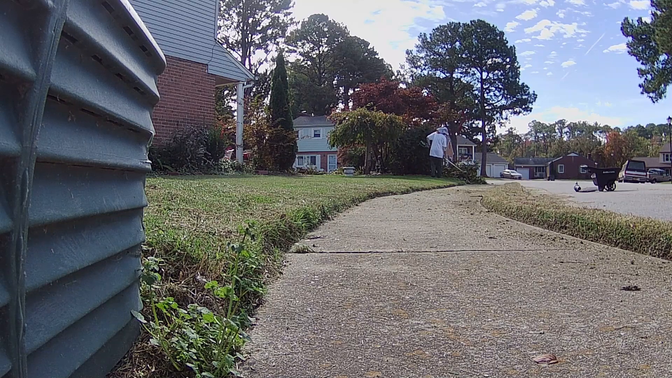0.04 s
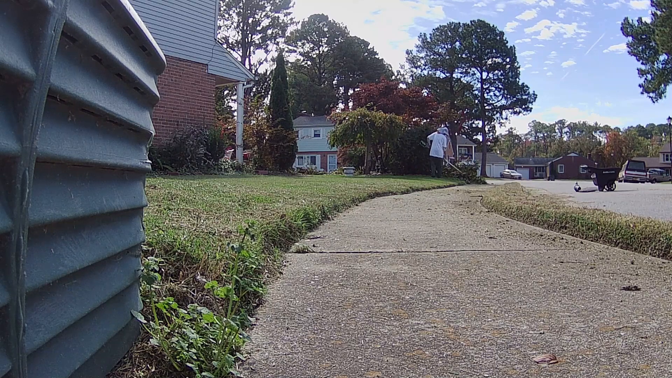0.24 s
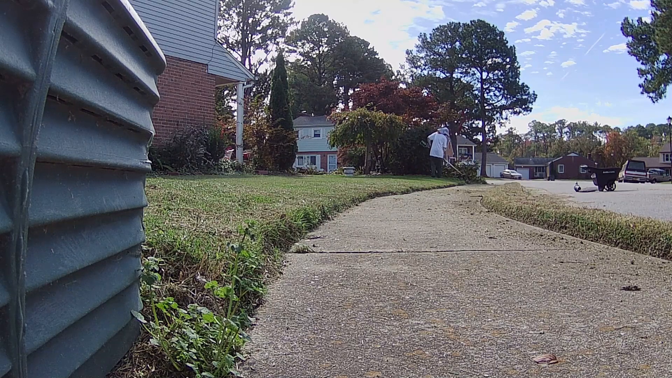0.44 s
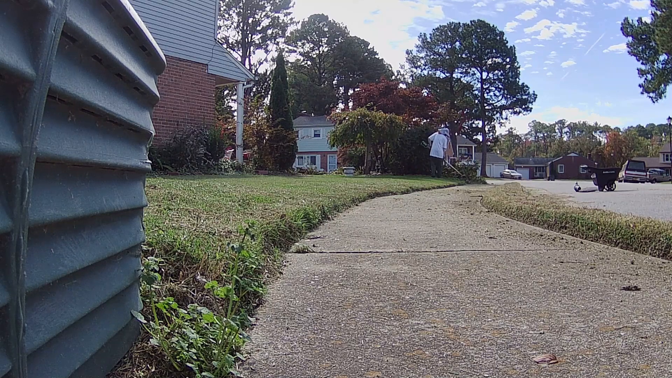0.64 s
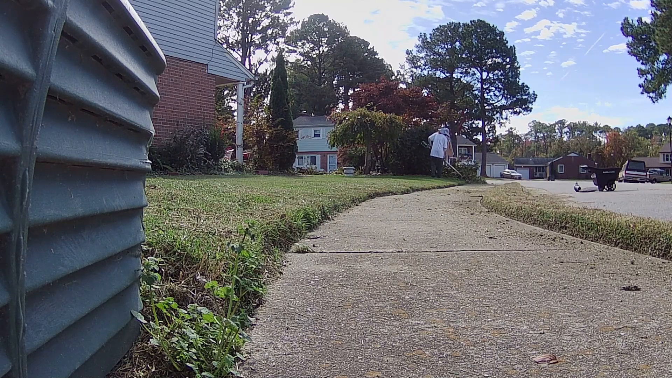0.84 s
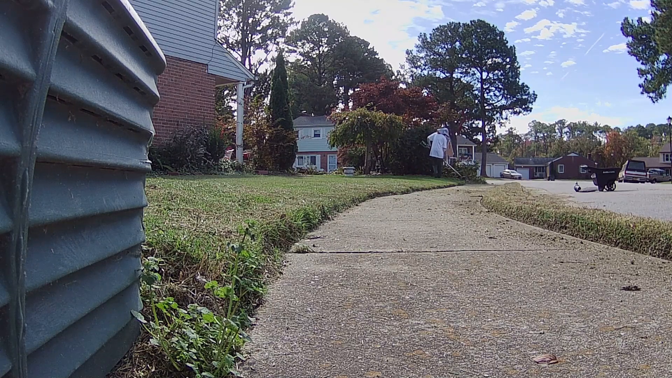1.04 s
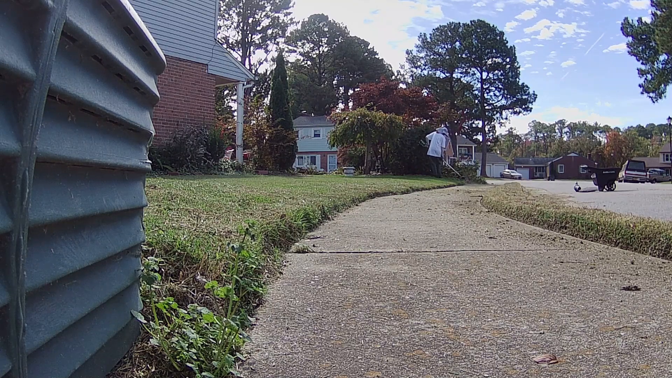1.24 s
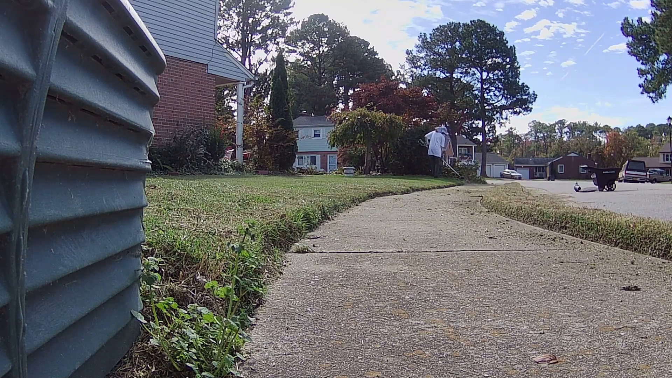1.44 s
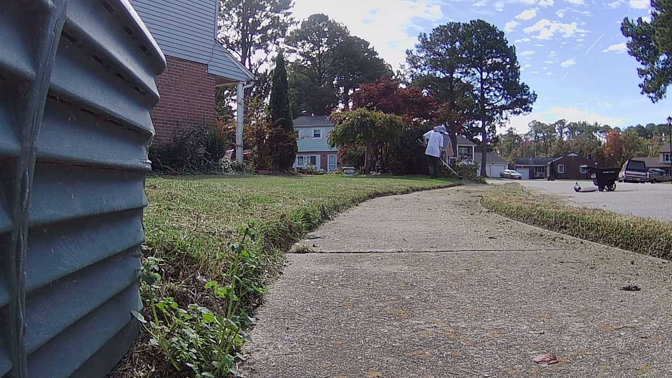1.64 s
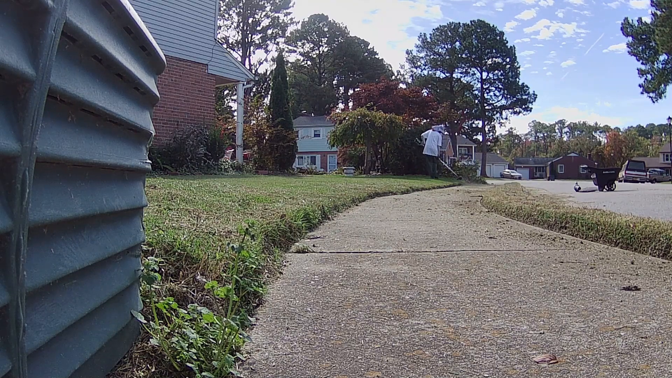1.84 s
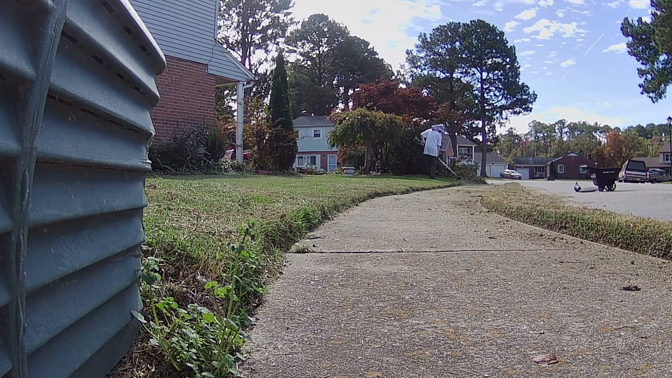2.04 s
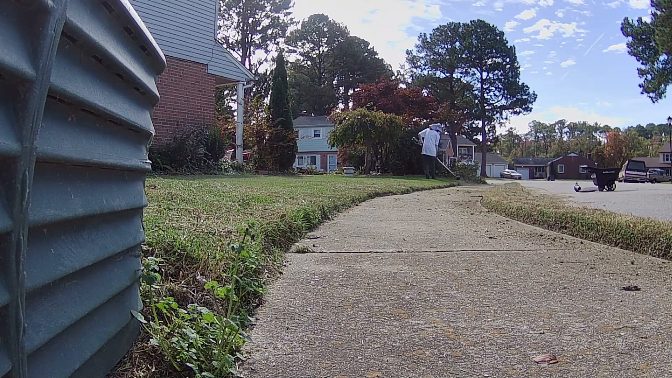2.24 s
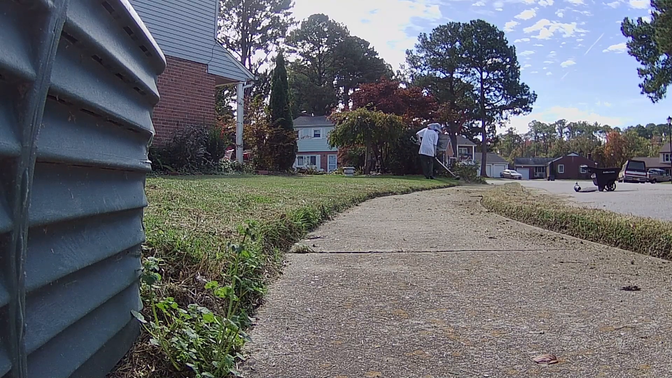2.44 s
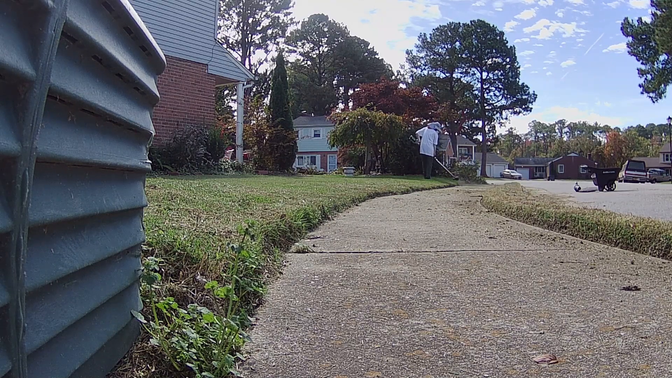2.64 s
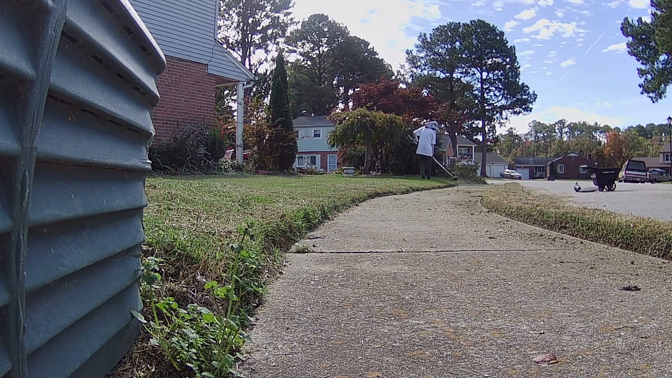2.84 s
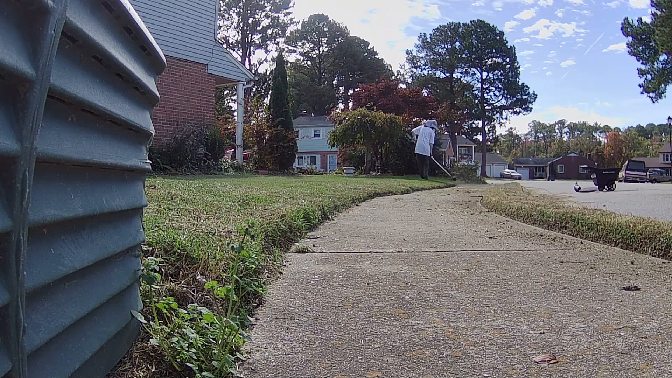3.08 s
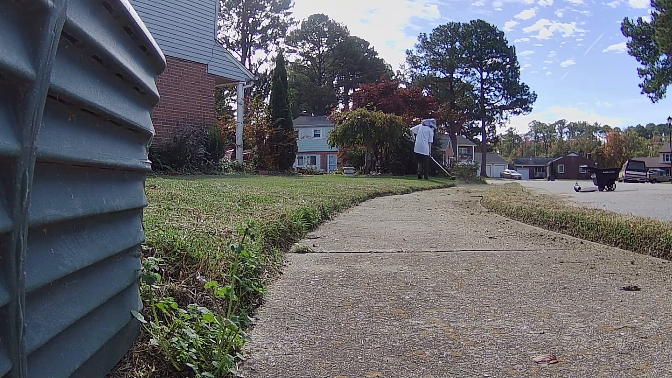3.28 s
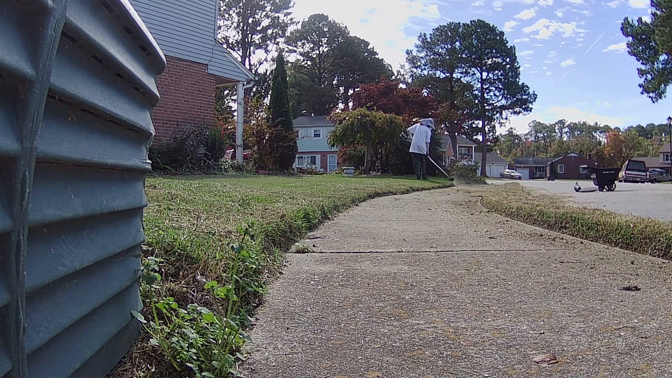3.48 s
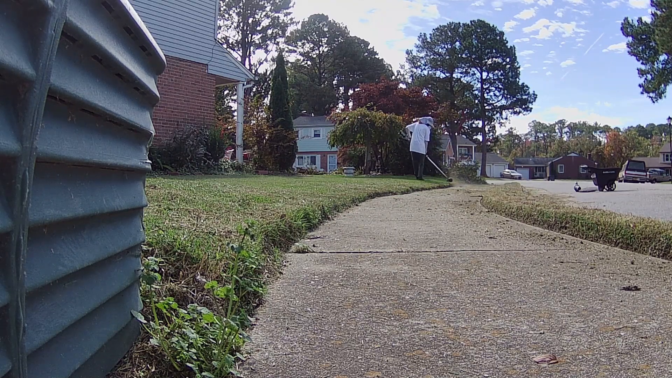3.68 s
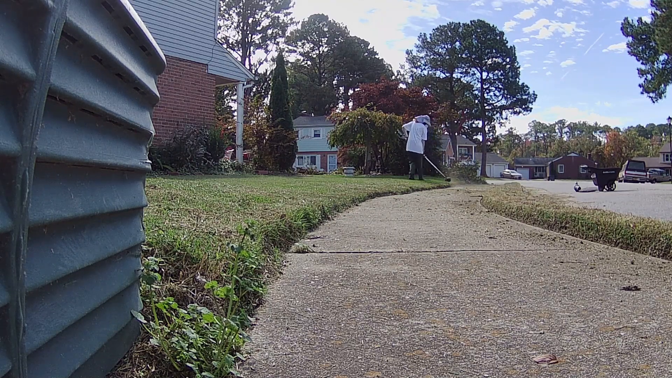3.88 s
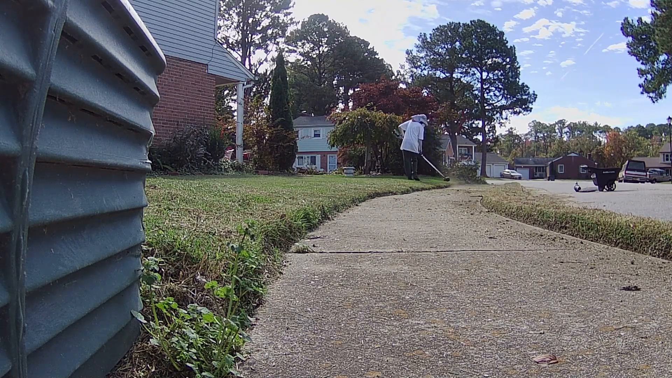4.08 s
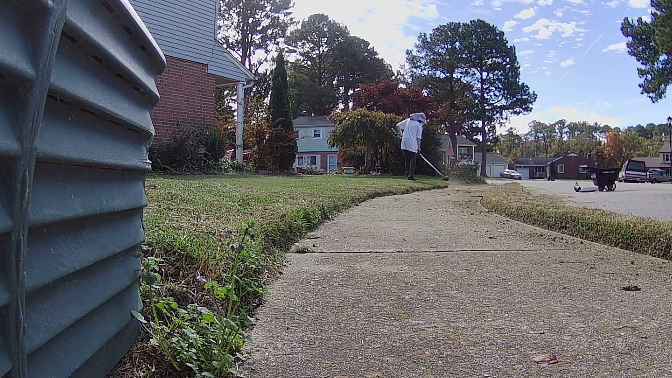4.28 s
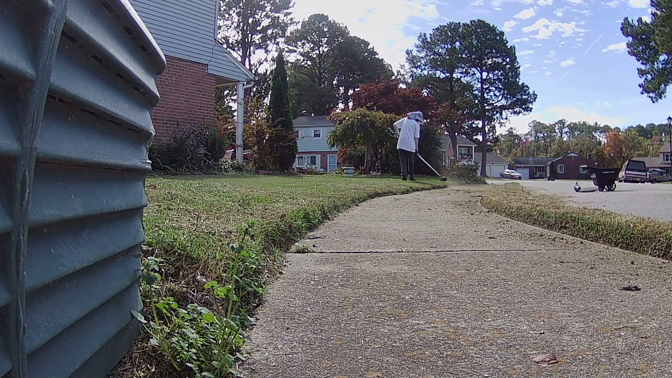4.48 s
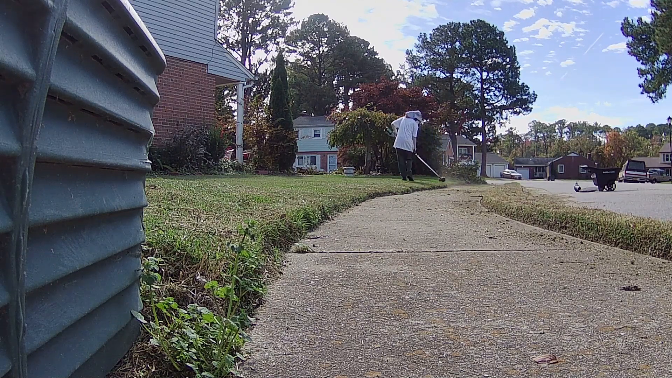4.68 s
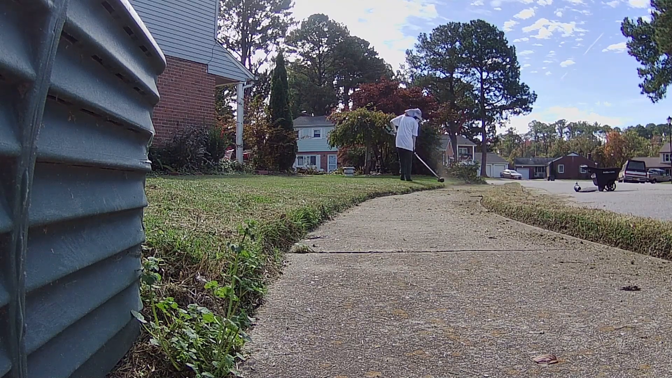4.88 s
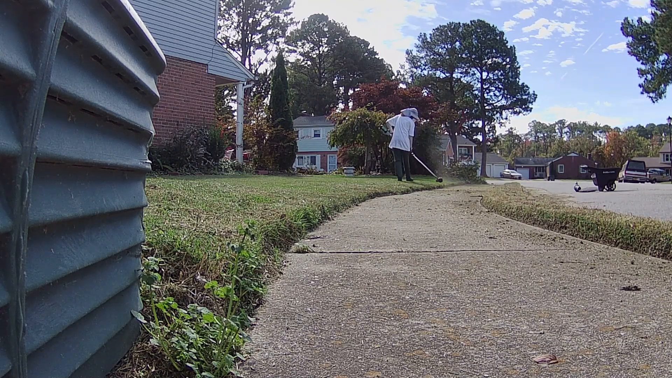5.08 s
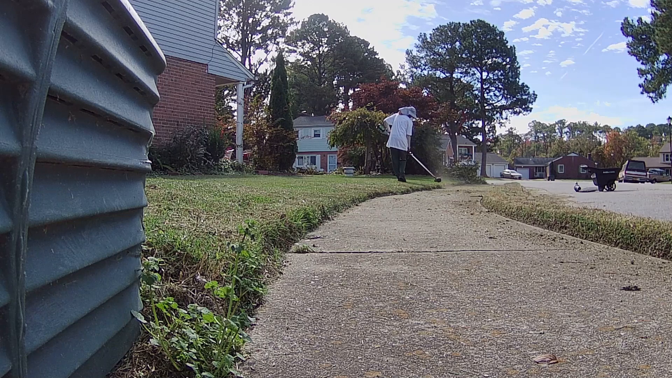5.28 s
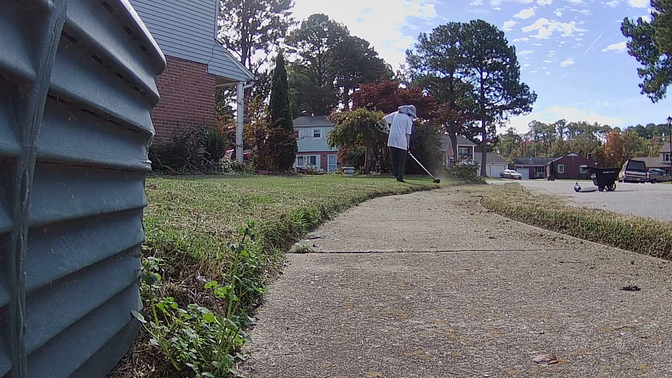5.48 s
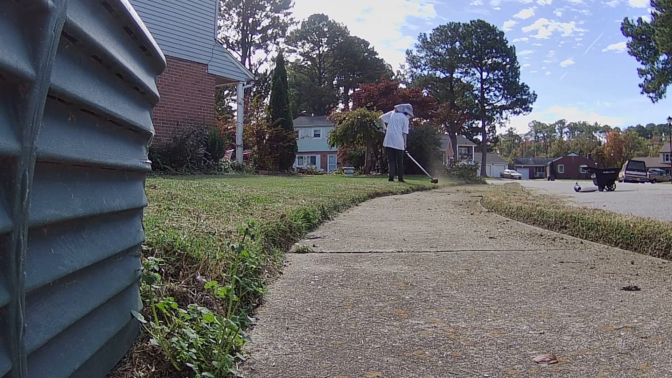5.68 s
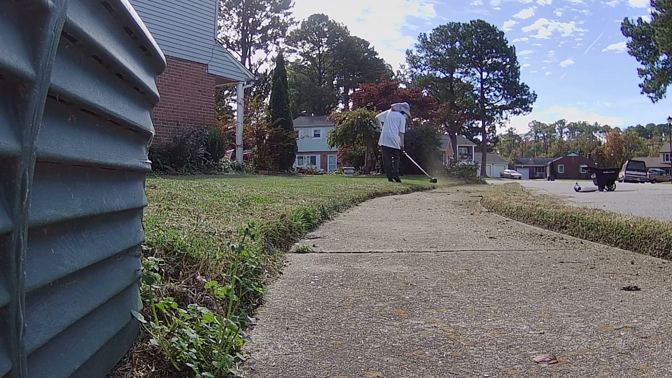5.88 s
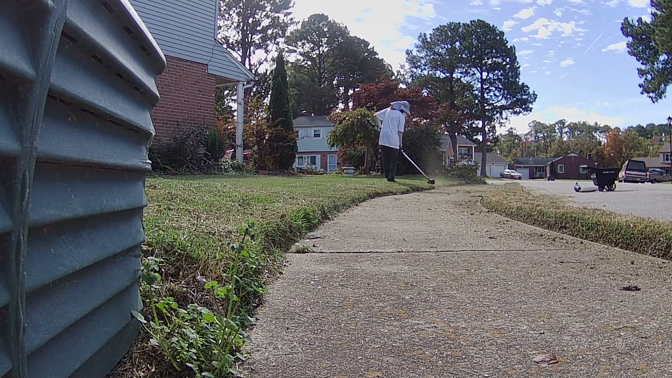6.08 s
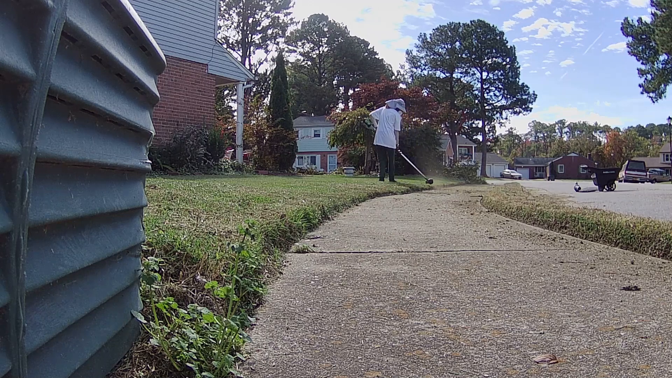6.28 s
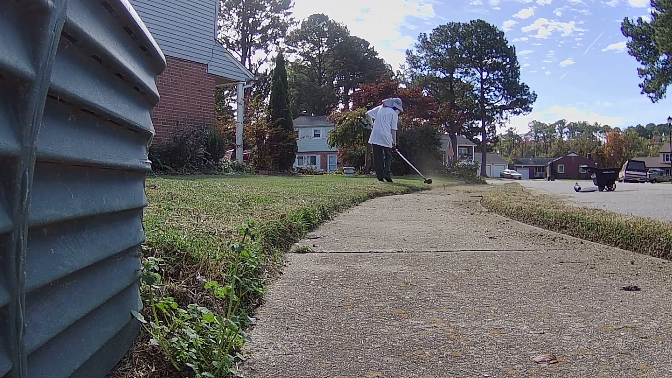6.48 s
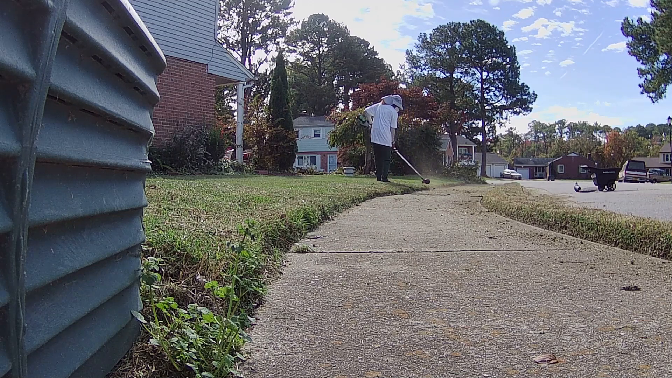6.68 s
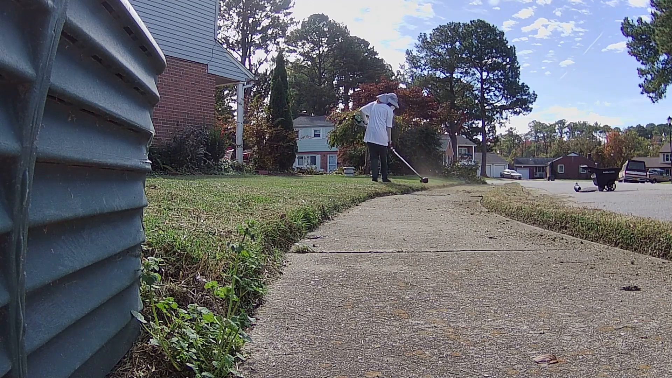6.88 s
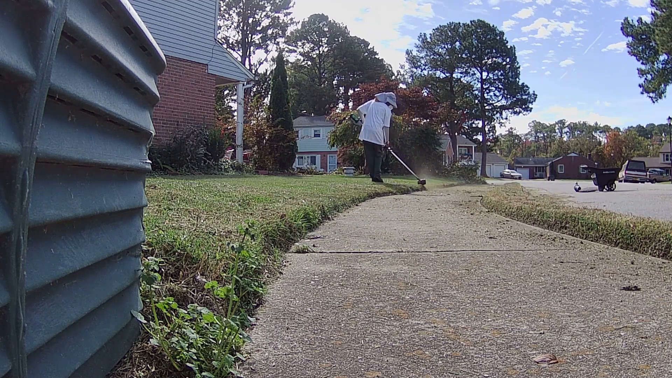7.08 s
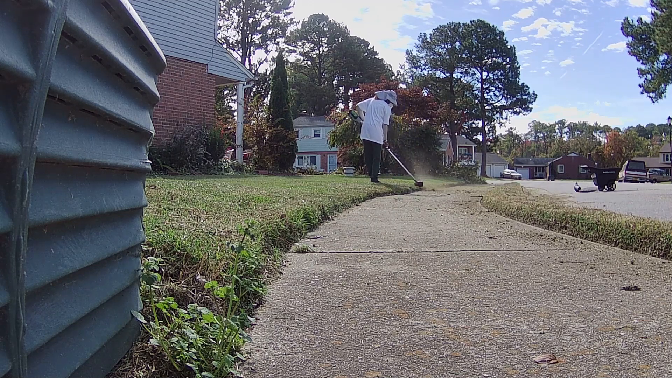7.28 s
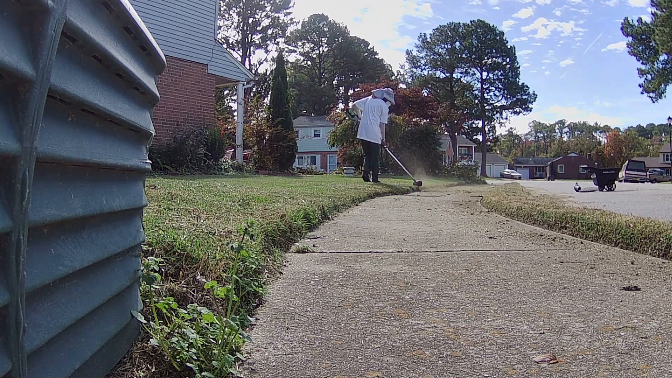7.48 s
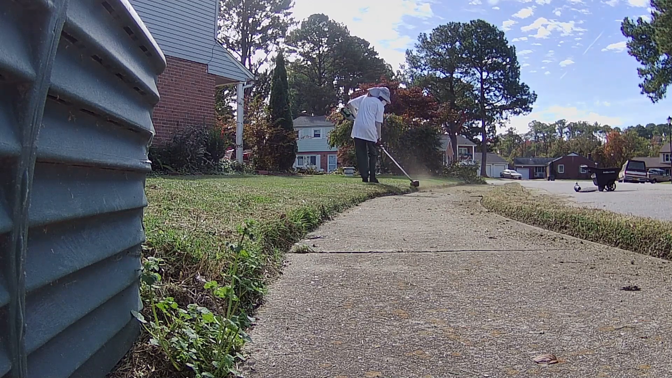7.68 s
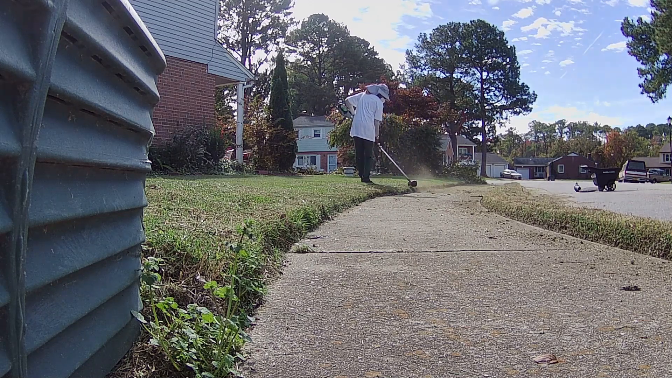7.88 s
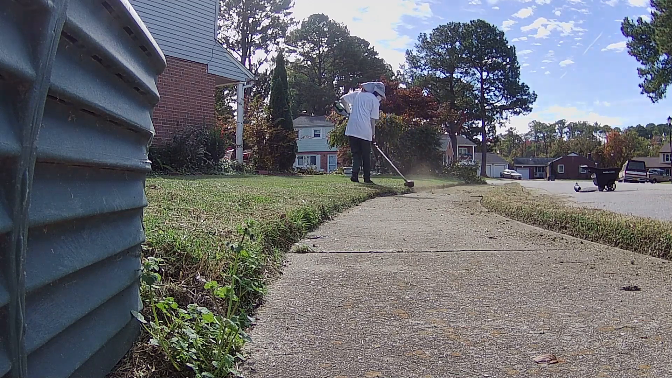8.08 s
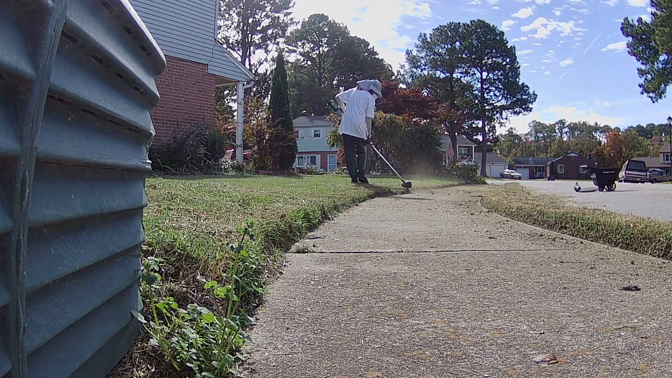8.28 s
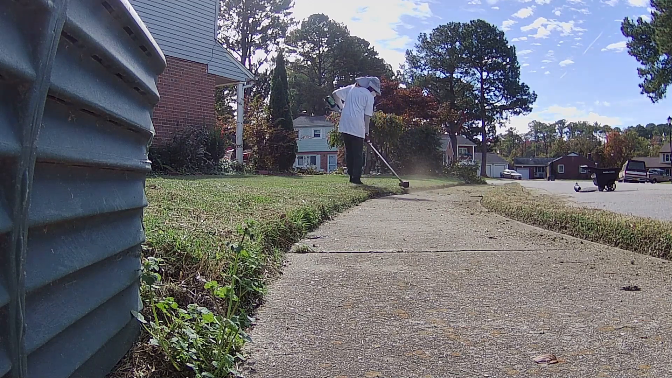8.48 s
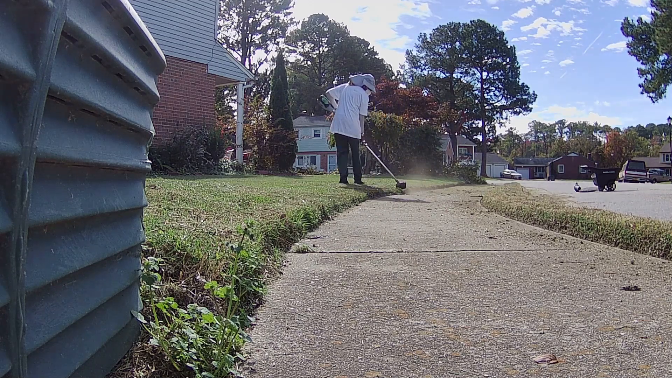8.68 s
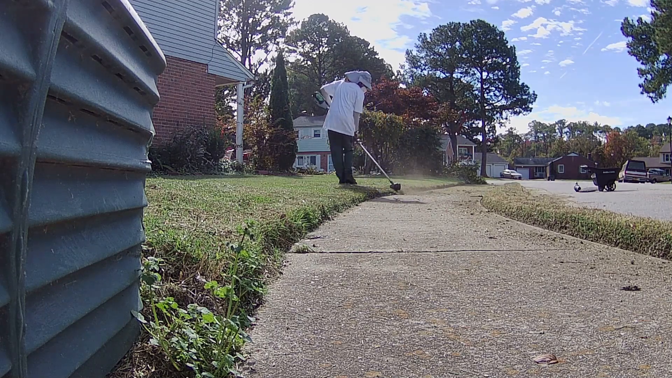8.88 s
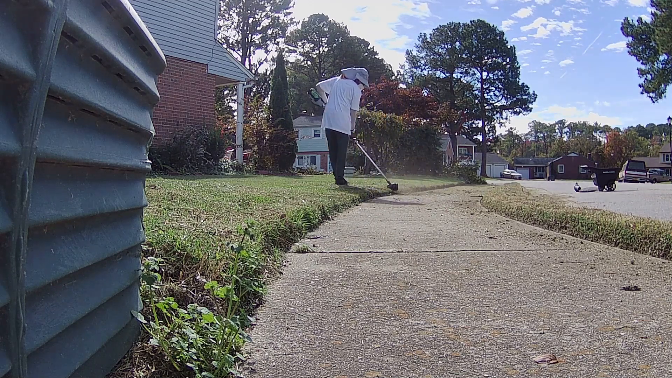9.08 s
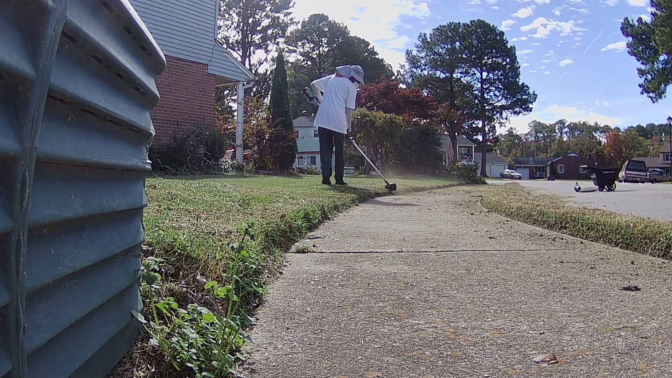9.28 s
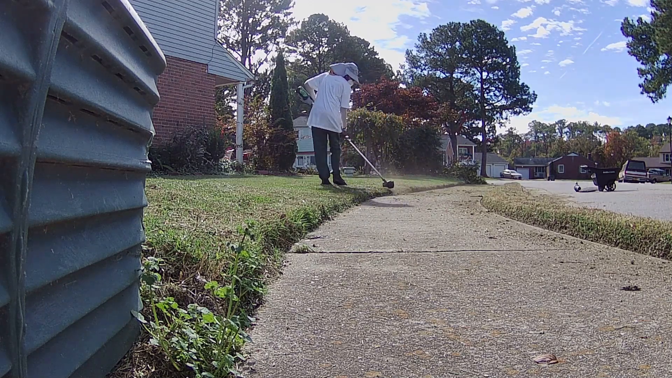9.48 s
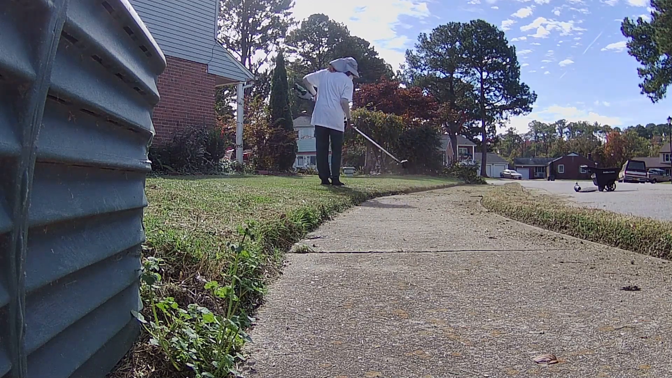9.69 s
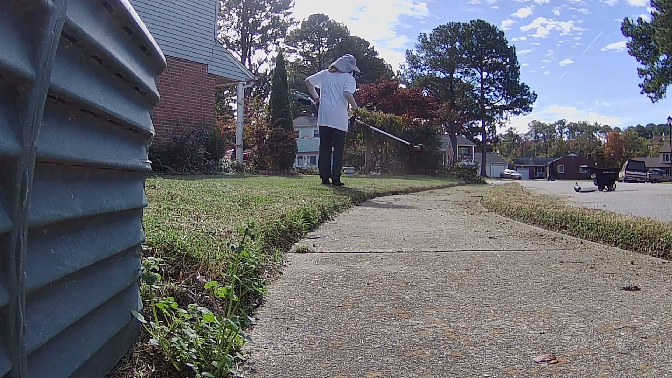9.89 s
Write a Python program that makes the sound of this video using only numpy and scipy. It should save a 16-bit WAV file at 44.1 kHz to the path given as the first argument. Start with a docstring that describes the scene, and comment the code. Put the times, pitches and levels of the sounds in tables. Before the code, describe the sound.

Outdoors on a quiet, faintly humming street, a battery string trimmer spins up with a brief bright whirr and thin whine. Its line hums steadily, then slaps the pavement edge in a fast crackling buzz and tears turf. The pitch sags briefly at each bite and recovers. It comes nearer and rougher, with occasional hard stone snaps, then lifts and coasts down. A fixed small microphone hears it from along the path.

```python
"""A battery string trimmer starts on a quiet, humming street: whirr and whine, then steady line hum.
Its user edges turf beside a pavement, walking towards the microphone. Two line ends pass per turn:
each pass pushes air (locked sines), cracks on the edge (pulses) and tears turf (swelling noise).
Bites slow the head and roughen the passes; stones give single hard snaps.
At the stop the line lifts and the head coasts down; the motor whirr then sets in again."""
import sys
import numpy as np
from scipy import signal
from scipy.fft import rfft, irfft
from scipy.io import wavfile
from scipy.ndimage import map_coordinates

SR = 44100
rng = np.random.default_rng(int(sys.argv[2]) if len(sys.argv) > 2 else 0)


def transcribe(signal):
    """Save signal, clipped to [-1, 1], as a 16-bit WAV file at the path in sys.argv[1]."""
    frames = np.atleast_2d(signal).T
    limited = np.clip(frames, -1, 1)
    pcm = np.round(limited * 32767).astype(np.int16)
    wavfile.write(sys.argv[1], SR, pcm)


N = 438354

# street noise, shape: (frequency [Hz], density [dB per Hz])
STREET_SPECTRUM = [(18, -44), (30, -20), (95, -11), (118, -6), (170, -2), (194, 0), (355, -14), (780, -27),
                   (962, -27), (2980, -44), (7500, -68), (16000, -54)]
# motor pulling up to speed: (time [s], whirr [dB], whine [dB])
MOTOR_LEVELS = [(.2, -100, -100), (.24, -80, -105), (.29, -68, -82), (.35, -76, -76), (.39, -84, -86),
                (.6, -100, -95), (9.8, -100, -100), (9.86, -74, -100), (9.9, -60, -100), (9.94, -56, -100)]
# whirr, shape: (frequency [Hz], density [dB per Hz])
WHIRR_SPECTRUM = [(4000, -3), (6000, 12), (7500, 10), (9000, 17), (11000, -29)]
# head between bites: (time [s], line passes [1/s], hum [dB], torn turf [dB])
CRUISE = [(.44, 358, -42, -67), (.66, 347, -45.5, -57.5), (.95, 339, -42.5, -57), (1.13, 326, -46, -54),
          (1.53, 331, -46.5, -55.5), (1.85, 335, -51, -51.5), (1.97, 334, -44.5, -54.5),
          (2.26, 325, -47, -51.5), (3.12, 334, -50.5, -51.5), (3.41, 336, -47.5, -52.5),
          (4.0, 301, -50.5, -50), (4.48, 323, -50.5, -50), (5.27, 312, -50.5, -48.5),
          (5.54, 292, -52.5, -45), (6.02, 305, -47, -46), (6.42, 301, -46.5, -45), (6.48, 299, -44, -43.5),
          (7.08, 337, -47, -47.5), (7.53, 310, -47.5, -44), (7.8, 318, -47.5, -46.5),
          (8.06, 326, -46.5, -46.5), (8.66, 322, -45.5, -44.5), (8.84, 317, -44, -42.5),
          (8.88, 323, -50, -45), (8.97, 308, -49, -50.5), (9.05, 296, -57, -53.5),
          (9.13, 310, -53.5, -49.5), (9.23, 316, -47, -49.5), (9.32, 327, -54, -49), (9.42, 320, -56, -47),
          (9.53, 348, -49, -51.5), (9.6, 337, -47, -49), (9.64, 370, -53, -52), (9.67, 372, -57, -62)]
# line bites turf: (time of slowest turning [s], speed loss [passes/s], braking [s], added unevenness [0-1])
BITES = [(1.62, 3.77, 0.053, 0.45), (1.812, 38.3, 0.11, 0.39), (2.25, 2.7, 0.027, 0.17),
         (2.371, 46.7, 0.062, 0.35), (2.668, 34.7, 0.049, 0.52), (2.931, 24.4, 0.15, 0.14),
         (3.21, 30.8, 0.22, 0.02), (3.72, 64.3, 0.19, 0.51), (4.6, 19.4, 0.043, 0.15),
         (4.89, 36.7, 0.1, 0.5), (5.33, 17, 0.083, 0.33), (5.459, 5.9, 0.053, 0.37),
         (5.759, 5.3, 0.077, 0.32), (6.139, 17.3, .15, 0.03), (6.721, 24.7, 0.16, 0.02),
         (7.15, 7.7, 0.041, 0.37), (7.3, 54, 0.2, 0.3), (7.776, 3.22, 0.029, 0), (7.9, 2.9, 0.03, 0.26),
         (8.09, 3.27, 0.025, 0.13), (8.2, 10.3, 0.16, 0), (8.421, 12, 0.096, 0.04),
         (8.57, 3.24, 0.028, 0.26), (8.979, 41, 0.23, 0.21), (9.271, 12.3, 0.11, 0.1)]
# passes between bites, one end stronger and earlier: (time [s], unevenness [0-1], excess [dB], lead [us])
EVENNESS = [(.7, .4, 1, 60), (.87, .25, 2.5, 170), (1.18, .25, 2.5, 170), (1.3, .38, 1, 70),
            (2.15, .36, 1, 110), (2.3, .4, 1, 60), (3.7, .4, 1, 60), (4.0, .36, 1, 70), (5.3, .38, 1, 70),
            (5.6, .46, 2, 40), (6.75, .46, 2.5, 50), (6.9, .33, 1, 50), (7.2, .36, 1, 50),
            (7.5, .55, 1, 40), (9.1, .55, 2, 60), (9.45, .5, 2, 60), (9.55, .36, 1, 60)]
# free line and thrown grit, shape: (frequency [Hz], density [dB per Hz])
HISS_SPECTRUM = [(300, -11), (1000, 2.5), (2500, 2.5), (5000, -9.5), (8000, -6.5), (12000, 4.5), (16000, 0)]
# torn turf, shape: (frequency [Hz], density [dB per Hz])
TURF_SPECTRUM = [(60, -55), (150, -6), (300, -0.5), (700, 4), (1500, 5.5), (3000, -3.5), (6000, -16.5),
                 (16000, -34)]
# line bogged in soil, shape: (frequency [Hz], density [dB per Hz])
THUD_SPECTRUM = [(120, -16), (250, -1.5), (450, 5), (700, -21), (1500, -57)]
# hum overtones: (multiple of pass rate [1], relative level [dB])
HUM_OVERTONES = [(1, -1), (2, -8), (3, -8.5), (4, -14), (5, -20), (6, -22)]
# overtones from the third up: (time [s], gain [dB])
BUZZ = [(.36, -18), (.5, -26), (1.5, -12.5), (3.0, -2.5), (4.5, -1), (5.5, 5), (6.7, -4), (7.05, -0.5),
        (7.4, -2), (7.8, -1), (8.7, -1), (9.1, 2), (9.4, 0), (9.6, -2), (9.7, 3)]
# one overtone stands out as the head turns: (time [s], multiple of pass rate [1], gain [dB])
RING = [(.4, 2, -4), (.9, 2, -3), (1.3, 2, 0), (3.7, 6, 0), (4.0, 6, 9), (4.5, 6, 12), (4.8, 6, 3),
        (5.1, 6, 11), (5.5, 4, 2), (6.7, 6, 4), (6.9, 6, 13), (7.08, 6, 14), (7.14, 6, 0), (7.4, 4, 0),
        (7.6, 4, 9), (8.75, 4, 10), (8.84, 4, 0), (8.86, 2, 3), (8.92, 2, 9), (9.08, 2, 8), (9.2, 2, 0),
        (9.3, 4, 0), (9.45, 4, 8), (9.66, 4, 8)]
# line tips on the edge: (time [s], crack [dB], snap relative to crack [dB])
CRACKS = [(.45, -65, 5), (.55, -64, 3), (.7, -58.5, 1.5), (.74, -51.5, -4), (.9, -48, -9), (.98, -44, -1.5),
          (1.06, -47.5, -3), (1.11, -43.5, -3), (1.26, -50.5, -4.5), (1.38, -45, -1.5), (1.5, -46, -1),
          (1.72, -43, -1.5), (1.8, -50.5, 1), (1.87, -51.5, 2.5), (1.95, -46, -7), (2.03, -51.5, -2.5),
          (2.14, -46, -5), (2.3, -44, -5), (2.35, -51, 1), (2.38, -45, 4), (2.48, -44, 4.5),
          (2.58, -44.5, -2), (2.81, -41.5, 3), (2.98, -44.5, -2), (3.04, -42, -2.5), (3.14, -39, 1.5),
          (3.22, -41, -5), (3.27, -40.5, -2.5), (3.41, -44.5, -3), (3.54, -41.5, -3), (3.62, -51.5, -3),
          (3.69, -46, -1), (3.72, -46, -3), (3.75, -43.5, 6), (3.87, -40, 3.5), (3.98, -40, -1),
          (4.05, -41, -20), (4.07, -40, 4), (4.2, -39.5, -3.5), (4.27, -39.5, -11), (4.35, -40, -2),
          (4.55, -38, -8), (4.74, -44, -3.5), (4.81, -38, -5.5), (5.0, -35.5, -2), (5.19, -37, -2.5),
          (5.27, -38, -13), (5.3, -43, 1), (5.35, -42.5, -6), (5.47, -35.5, -5.5), (5.5, -44.5, -5),
          (5.62, -36.5, 0.5), (5.8, -40.5, 3), (5.85, -37.5, -4), (5.9, -34, 4.5), (6.0, -38, 0),
          (6.06, -39, -4.5), (6.13, -40.5, 3), (6.2, -40, 4), (6.28, -37.5, 5), (6.36, -36, -4),
          (6.46, -39.5, 9.5), (6.6, -36, 0.5), (6.65, -39.5, 1), (6.77, -37.5, 7), (6.85, -34, 0.5),
          (6.88, -40.5, 0), (7.1, -41, -1.5), (7.27, -52.5, -1), (7.35, -48, 7), (7.44, -43.5, 5),
          (7.5, -46.5, 8), (7.8, -45.5, 4.5), (7.95, -43.5, 1.5), (8.14, -42, 2), (8.3, -46.5, 6),
          (8.52, -46, 8.5), (8.65, -46, 3), (8.85, -52.5, 7.5), (8.92, -63, 11), (8.97, -65, 5),
          (9.08, -70, 11), (9.11, -61, 10), (9.16, -53.5, 12.5), (9.25, -52.5, 4.5), (9.3, -53.5, 12.5),
          (9.42, -60, 12), (9.53, -59, 11.5), (9.58, -59.5, 7.5), (9.66, -59, 3)]
# hard strikes on stones after a skip: (time [s], level over usual snap [dB], skip [s])
STONES = [(1.0715, 9, .02), (1.8418, 8, .014), (2.364, 9, .002), (3.6502, 12, .03), (3.6615, 9, .01),
          (3.6838, 9, .02), (3.6875, 9, .002), (5.312, 11, .015), (6.127, 6, .02), (6.461, 4, .006),
          (9.012, 9, .006), (9.1325, 7, .014), (9.1595, 7, .012), (9.352, 6, .006)]
# inverted bounce off the ground, moving with the head: (time [s], delay [ms])
BOUNCE = [(0, 0.26), (4, 0.29), (5.3, 0.31), (5.7, 0.29), (6.9, 0.31), (8.1, 0.3), (8.5, 0.2988),
          (8.9, 0.47), (9.94, 0.35)]
# fence and walls: (delay [s], level [dB])
ECHOES = [(.00092, -27.5), (.0047, -20), (0.019, -27), (.043, -38)]
# microphone peaks and dips: (centre [Hz], width [Hz], gain [dB])
MICROPHONE = [(2753, 300, 4), (5130, 3600, 4.5), (7720, 1930, 11), (13230, 570, -20), (15130, 6600, 8)]

STREET_DB = -64.5
WHINE_MULTIPLE = 15  # of the pass rate
START_S, SPIN_UP_S = .24, .05
STOP_S, COAST_PER_S2, LIFT_S = 9.67, 760, .043  # coast: passes/s lost per s; lift: line leaves the grass
BRAKE_CURVE = 1.7  # above 1: slows fast at first, then levels off
RECOVER_S, SETTLE_S = .107, .035  # speed returns; passes even out
WOBBLE = .0025  # speed flutter, rms share
BITE_HUM_DB, BITE_TURF_DB = -.0541, 3.5  # per lost pass/s; per unit of added unevenness
SPIN_DB, SPIN_HISS_DB, COAST_HUM_DB = 58, 11, 20  # per octave below cruise: hum and turf; hiss; coasting hum
AIR_DB, SPRAY_DB = -61, -21  # hiss of free line; hiss of thrown grit relative to snap
TUFTS_DB, TUFTS_HZ = 2, 12  # turf thins between tufts
HUM_LAG_PASSES = .086  # hum trough follows the crack
STEEPEN_DB = -3.5  # overtone tilt per multiple and octave of speed
BOGGED_OVERTONE_DB = -24  # upper overtones, per unit of unevenness
COAST_OVERTONE_DB = 40  # full loss from the fourth multiple up, a share of it on the second and third, once the line has lifted
SLAP_JITTER_S, SLAP_SPREAD_DB = .00028, 10  # at full unevenness
SNAP_JITTER_S, ROUGH_SNAP_SPREAD_DB = .00025, 8  # at full unevenness
SNAP_SPREAD_DB = 4.5  # at any unevenness
BLOW_DIPS_DB, SNAP_DIPS_DB = .6, 2.5  # brief losses of contact
SKIP_DB, STRIKE_SHARE = -12, .4  # snap gain during a skip; share of a strike's dB given to the whole blow
SNAP_LAG_US = 135  # the snap falls in the pull
BURIED_DB = -6.5  # bogged line cracks less, per unit of unevenness above .62
LOW_CUT_HZ, STOPBAND_HZ = 93, 16200
PEAK_TOP = .15  # input rounds the sharpest cracks


def from_db(db):
    """Level to amplitude."""
    return 10 ** (np.asarray(db) / 20)


def rms_one(x):
    """Scale to rms 1."""
    return x / np.sqrt(np.mean(x ** 2) + 1e-20)


def in_time(rows):
    """Table columns interpolated at every sample."""
    s, *columns = np.transpose(rows)
    return [np.interp(np.arange(N) / SR, s, c) for c in columns]


def coloured(x, spectrum):
    """Shape x by a spectrum drawn straight on a log-frequency axis; rms 1."""
    hz, db = np.transpose(spectrum)
    bins_hz = np.maximum(np.arange(N // 2 + 1) * SR / N, 1)
    gain_db = np.interp(np.log(bins_hz), np.log(hz), db)
    return rms_one(irfft(rfft(x) * from_db(gain_db), N))


def drift(rate_hz):
    """Slow chance, rms 1: noise twice through a one-pole low-pass."""
    r = np.exp(-2 * np.pi * rate_hz / SR)
    noise = rng.standard_normal(N + SR)
    return rms_one(signal.lfilter([1], [1, -2 * r, r * r], noise)[SR:])


def bell(x, hz, width_hz, db):
    """A resonant peak or dip of the given height."""
    w, a, g = 2 * np.pi * hz / SR, np.tan(np.pi * width_hz / SR), from_db(db / 2)
    b = [1 + a * g, -2 * np.cos(w), 1 - a * g]
    return signal.lfilter(b, [1 + a / g, -2 * np.cos(w), 1 - a / g], x)


def per_pass(passes, depth, sharp, lumpy_db):
    """Noise that swells at each pass, every swell with its own size."""
    sizes = from_db(lumpy_db * np.minimum(rng.standard_normal(4000), 1))
    swell = sizes[np.round(passes).astype(int)] * np.exp(sharp * (np.cos(2 * np.pi * passes) - 1))
    return rng.standard_normal(N) * (1 + depth * swell)


def street():
    """Steady hum of a quiet street: coloured noise."""
    return from_db(STREET_DB) * coloured(rng.standard_normal(N), STREET_SPECTRUM)


def head():
    """Speed, levels and unevenness from trigger, bites and contact with the edge."""
    t = np.arange(N) / SR
    cruise_per_s, hum_db, turf_db = in_time(CRUISE)
    lost_per_s, bogged = np.zeros(N), np.zeros(N)
    for s, loss, brake_s, rough in BITES:
        after_s = np.maximum(t - s, 0)
        braking = 1 - np.clip((s - t) / brake_s, 0, 1) ** BRAKE_CURVE
        lost_per_s += loss * braking * np.exp(-after_s / RECOVER_S)
        digging = np.clip(4 + 4 * (t - s) / brake_s, 0, 1)  # full after a quarter of the braking
        bogged += rough * digging * np.exp(-after_s / SETTLE_S)
    short_per_s = cruise_per_s * np.exp(-np.maximum(t - START_S, 0) / SPIN_UP_S)
    short_per_s += COAST_PER_S2 * np.maximum(t - STOP_S, 0)
    slow_octaves = np.log2(np.clip(1 - short_per_s / cruise_per_s, .01, 1))
    lifted_db = -40 * np.clip((t - STOP_S) / LIFT_S, 0, 1)

    crack_db, snap_db = in_time(CRACKS)
    grit_db = crack_db + snap_db + SPRAY_DB + lifted_db
    hiss_gain = from_db(SPIN_HISS_DB * slow_octaves) * np.hypot(from_db(AIR_DB), from_db(grit_db))
    turf_gain = from_db(turf_db + BITE_TURF_DB * bogged + SPIN_DB * slow_octaves + lifted_db)
    spin_db = np.where(t < STOP_S, SPIN_DB, COAST_HUM_DB) * slow_octaves
    hum_db = hum_db + BITE_HUM_DB * lost_per_s + spin_db
    per_s = np.maximum(cruise_per_s - short_per_s - lost_per_s, 1)
    uneven = np.clip(in_time(EVENNESS)[0] + bogged, 0, 1)
    return per_s, hum_db, turf_gain, hiss_gain, uneven


def motor(passes):
    """A bright noise whirr and a thin pole whine locked to the rotation."""
    whirr_db, whine_db = in_time(MOTOR_LEVELS)
    whirr = from_db(whirr_db) * coloured(rng.standard_normal(N), WHIRR_SPECTRUM)
    return whirr + from_db(whine_db) * np.sin(2 * np.pi * WHINE_MULTIPLE * passes)


def line_hiss(passes, gain):
    """Free line in air and thrown grit: bright noise pulsing at each pass."""
    return gain * coloured(per_pass(passes, depth=.8, sharp=3, lumpy_db=2), HISS_SPECTRUM)


def torn_turf(passes, uneven, gain):
    """Grass tears at each pass; low thuds join as the line bogs in soil."""
    turf = coloured(per_pass(passes, depth=1.2, sharp=1.5, lumpy_db=3), TURF_SPECTRUM)
    tufts = from_db(TUFTS_DB * np.minimum(drift(TUFTS_HZ), .5))
    thud = coloured(per_pass(passes, depth=9.1, sharp=1, lumpy_db=4), THUD_SPECTRUM)
    return gain * (tufts * turf + from_db(.5) * uneven ** 3 * thud)


def hum(passes, per_s, hum_db, uneven, waver_db):
    """Line displaces air: locked sines share a trough per pass; overtones weaken as speed rises."""
    speed_octaves = np.log2(np.maximum(per_s, 200) / 330)
    buzz_db = in_time(BUZZ)[0] + BOGGED_OVERTONE_DB * (uneven - .4)
    coast_db = COAST_OVERTONE_DB * np.clip((np.arange(N) / SR - STOP_S) / LIFT_S, 0, 1)
    ring_multiple, ring_db = in_time(RING)
    wave = np.zeros(N)
    for k, db in HUM_OVERTONES:
        level_db = db + (k - 1.5) * STEEPEN_DB * speed_octaves * (coast_db == 0)  # no tilt in the coast
        level_db += (k > 2.5) * buzz_db
        level_db += np.minimum(k, 2.4) * drift(4.2)
        level_db -= np.clip(k * .55 - .9, 0, 1) * coast_db
        level_db += ring_db * np.exp(-2 * (k - ring_multiple) ** 2)
        wave -= from_db(level_db) * np.cos(2 * np.pi * k * (passes - HUM_LAG_PASSES))
    return np.sqrt(2) * from_db(hum_db + waver_db * uneven * drift(65)) * wave


def cracks(passes, uneven):
    """Each pass slaps the edge: a push, a slower pull, and a sharp, less regular snap."""
    crack_db, snap_db = in_time(CRACKS)
    at = np.flatnonzero(np.diff(np.floor(passes)) > 0) + 1
    size, timing, pull_luck, snap_size, edge_luck, snap_timing = rng.standard_normal((6, len(at)))
    _, end_db, lead_us = in_time(EVENNESS)
    end = np.arange(len(at)) % 2 - .5  # the two line ends take turns
    rough = uneven[at] ** 2
    contact = np.minimum(drift(13)[at], .5)

    late = SLAP_JITTER_S * SR * rough * timing - lead_us[at] * end * SR / 1e6  # samples
    late -= passes[at] % 1 / np.gradient(passes)[at]  # exact moment between samples
    blow_db = BLOW_DIPS_DB * contact + SLAP_SPREAD_DB * rough * np.minimum(size, .6) + end_db[at] * end
    sharp_db = ROUGH_SNAP_SPREAD_DB * uneven[at] * np.minimum(size, .6)
    sharp_db += SNAP_SPREAD_DB * np.minimum(snap_size, .4) + SNAP_DIPS_DB * contact + end_db[at] * end
    for s, db, skipped_s in STONES:
        struck = np.argmin(np.abs(at - s * SR))
        sharp_db[(at > (s - skipped_s) * SR) & (at < at[struck])] = SKIP_DB
        blow_db[struck], sharp_db[struck] = STRIKE_SHARE * db, db

    span = np.arange(-40, 60)
    us = (span - late[:, None]) / SR * 1e6
    push = np.exp(-.5 * (us / 32) ** 2)
    pull = .96 * np.exp(-.5 * ((us - 170 - 6 * pull_luck[:, None]) / 45) ** 2)
    snap_gain = from_db(snap_db[at] + 6 + sharp_db)[:, None]
    edge_us = np.clip(32 - .5 * snap_db[at] + .73 * edge_luck, 13, 40)[:, None]  # harder is steeper
    snap_us = us - SNAP_LAG_US - (SNAP_JITTER_S * 1e6 * rough * snap_timing)[:, None]
    snap = -snap_gain * snap_us / edge_us * np.exp(-.5 * (snap_us / edge_us) ** 2)
    sand = np.diff(rng.standard_normal((len(at), 101))) * np.exp(-.5 * (snap_us / 150) ** 2)
    snap += from_db(-18.5) * snap_gain * sand  # scattered by the tip

    train = np.zeros(N + 200)
    np.add.at(train, at[:, None] + span + 40, from_db(blow_db)[:, None] * (push - pull) + snap)
    train = rms_one(signal.lfilter([1, -1], [1, -.985], train)[40:N + 40])  # offset removed
    touching = (np.arange(N) > CRACKS[0][0] * SR) & (np.arange(N) < STOP_S * SR)
    return touching * from_db(crack_db + BURIED_DB * np.maximum(uneven - .62, 0)) * train


def ground_bounce(x, db):
    """A short moving echo of opposite sign, mostly treble, cuts drifting notches."""
    lag = in_time(BOUNCE)[0] * SR / 1000
    bright = signal.sosfilt(signal.butter(1, 1500, "high", fs=SR, output="sos"), x)
    return x - from_db(db) * map_coordinates(bright, [np.arange(N) - lag], order=3)


def wall_echoes(blows):
    """Fence and walls return delayed, duller cracks."""
    dull = signal.lfilter([.6], [1, -.4], blows)
    echoes = np.zeros(N)
    for delay_s, db in ECHOES:
        lag = round(delay_s * SR)
        echoes[lag:] += from_db(db) * dull[:-lag]
    return echoes


def scene():
    """Street, then the trimmer with its reflections."""
    per_s, hum_db, turf_gain, hiss_gain, uneven = head()
    passes = np.cumsum(per_s * (1 + WOBBLE * drift(12))) / SR
    spray = line_hiss(passes, hiss_gain) + torn_turf(passes, uneven, turf_gain)
    blows = cracks(passes, uneven)
    trimmer = ground_bounce(motor(passes) + spray + blows, db=-13.5)
    trimmer += hum(passes, per_s, hum_db, uneven, waver_db=1.5)
    return (street() + trimmer + wall_echoes(blows))[None]


def record(dry):
    """A small microphone behind a port rings near 8 kHz; peaks are rounded, both ends are cut."""
    x = dry
    for hz, width_hz, db in MICROPHONE:
        x = bell(x, hz, width_hz, db)
    x = PEAK_TOP * np.tanh(x / PEAK_TOP)
    x = signal.sosfilt(signal.butter(1, LOW_CUT_HZ, "high", fs=SR, output="sos"), x)
    return signal.sosfilt(signal.cheby2(14, 60, STOPBAND_HZ, fs=SR, output="sos"), x)


dry = scene()
out = record(dry)
transcribe(out)
```